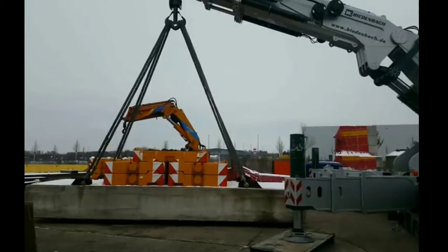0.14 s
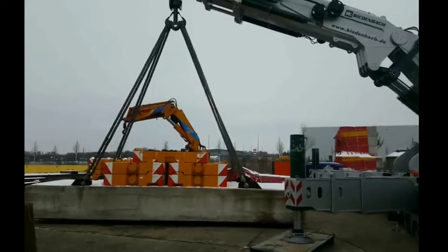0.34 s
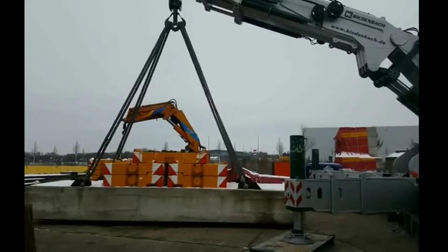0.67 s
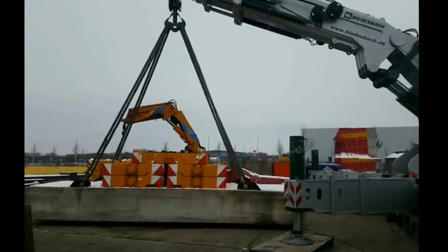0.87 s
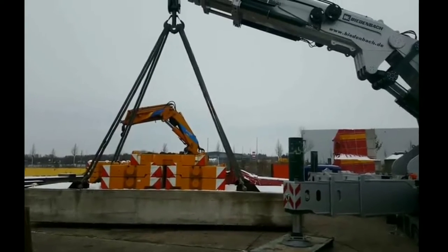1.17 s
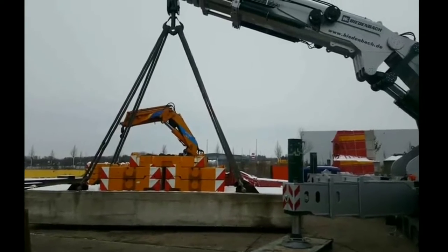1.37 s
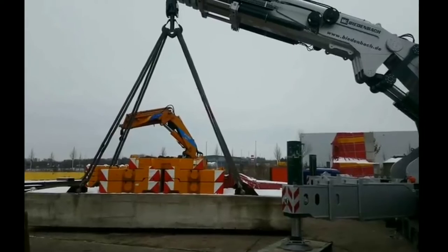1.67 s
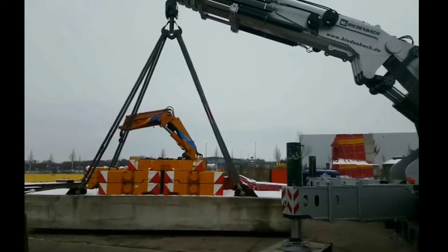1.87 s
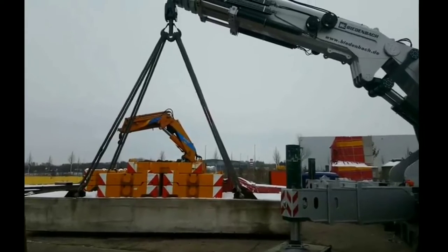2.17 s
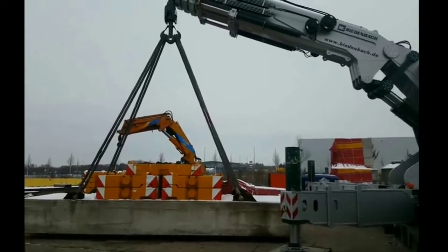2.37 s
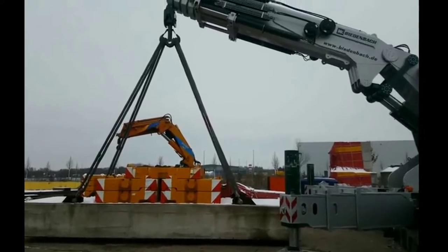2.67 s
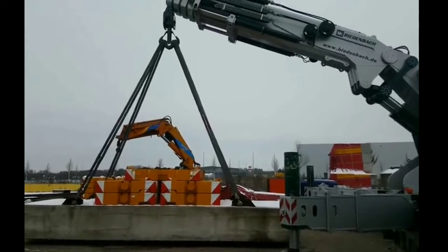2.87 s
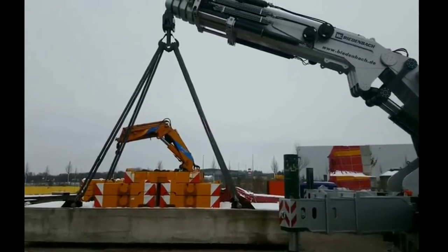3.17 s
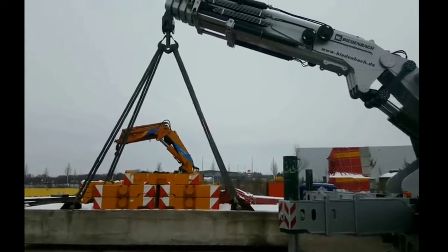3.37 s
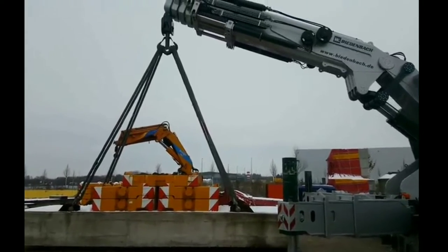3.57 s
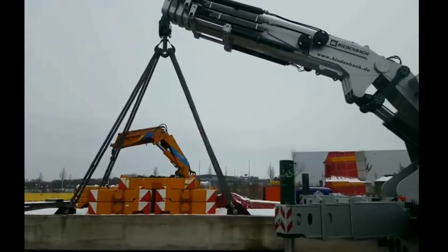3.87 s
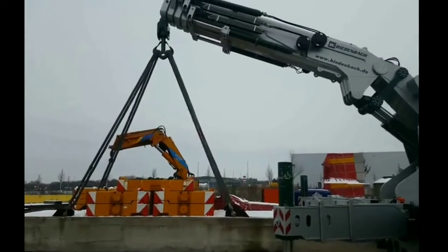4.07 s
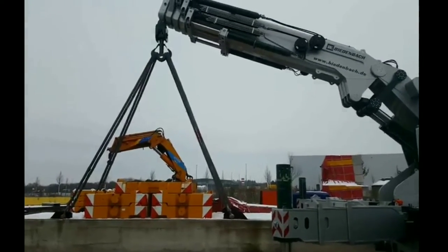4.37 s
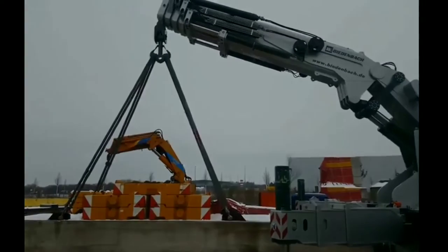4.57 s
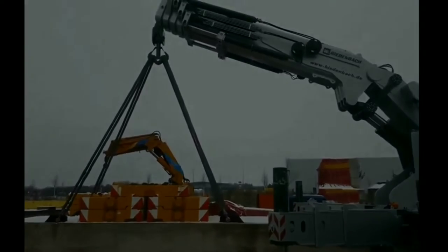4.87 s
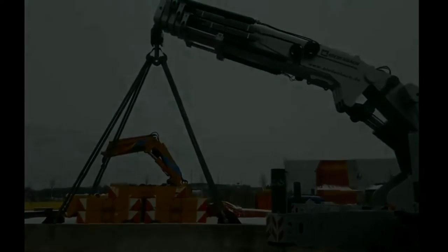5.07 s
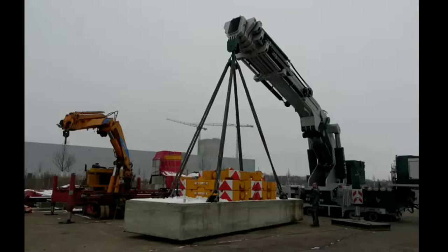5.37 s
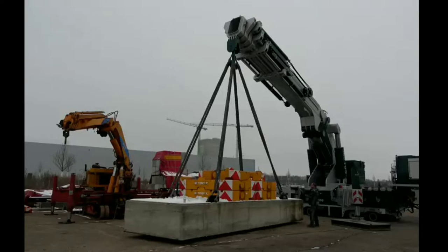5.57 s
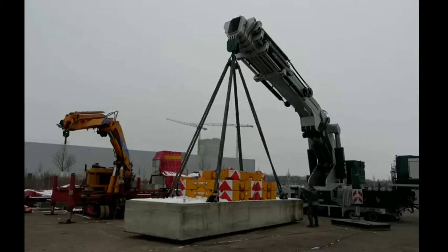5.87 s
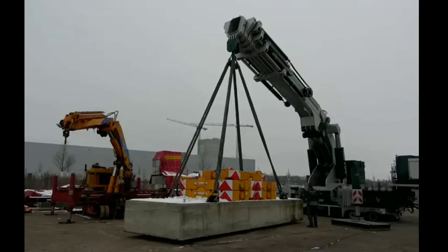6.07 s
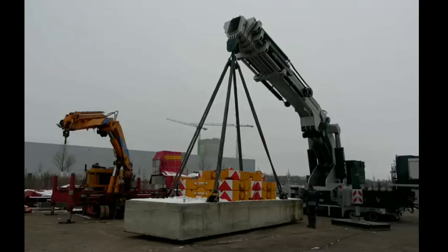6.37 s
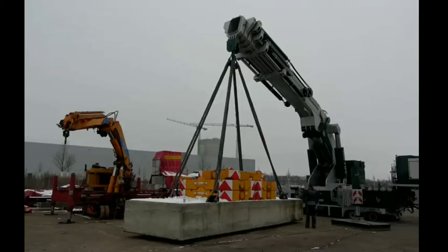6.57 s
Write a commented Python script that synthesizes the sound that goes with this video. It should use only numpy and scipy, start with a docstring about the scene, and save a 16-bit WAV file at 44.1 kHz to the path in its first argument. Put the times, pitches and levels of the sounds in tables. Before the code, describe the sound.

Heard close and in stereo outdoors, a crane's diesel engine holds a constant speed while its hydraulic pump and gears whine in several steady pitches over a rushing roar. The level steps down and fades out. With a brief click, the same machine cuts in from a distant mono position, its roar softer, and oil whistles through a valve on one high note until the end.

```python
"""An open yard, where a truck crane lifts a load. A six-cylinder diesel at governed speed drives a
seven-piston pump through gears; each radiates tones at multiples of the shaft rate, while a fan and a
second drive sing along over roar and clatter. The machine is heard close by at two spaced points, then
fades out; the sound cuts to a distant mono position, where oil also whistles through a valve."""
import sys
import numpy as np
from scipy import signal
from scipy.fft import rfft, irfft, next_fast_len
from scipy.io import wavfile
from scipy.ndimage import uniform_filter1d

SR = 44100
rng = np.random.default_rng(int(sys.argv[2]) if len(sys.argv) > 2 else 0)


def log_audio(samples):
    """Write samples as a 16-bit WAV file to the path given in sys.argv[1]."""
    # one column per channel
    frames = np.atleast_2d(samples).T
    # limit to full scale, then quantise
    limited = np.clip(frames, -1, 1)
    pcm = np.round(limited * 32767).astype(np.int16)
    wavfile.write(sys.argv[1], SR, pcm)


N = 296793
T = np.arange(N) / SR

SHAFT_HZ, FAN_HZ, DRIVE_HZ = 25.995, 53.35, 354.93
FADE_S, FADE_END_S, CUT_S = 4.118, 5.621, 5.6382

# Line spectra of the rotating parts. Each row: multiple of the shaft rate (for fan and second drive,
# of their own rate), near level in dB, near left minus right in dB, far level in dB.
ENGINE_TONES = [(2, -52, -1, -60), (3, -29.5, -1, -42), (3.5, -56, -3, -57), (4.5, -44.5, -1, -67),
                (5, -54, 0, -52), (5.5, -56, 1, -55), (6, -33.5, -1, -44), (6.5, -41, -1, -56),
                (7.5, -41, -1, -51), (9, -46, -2, -57), (10, -40, -2, -49), (12, -44, 8, -63),
                (15, -50, -6, -65), (18, -51, -6, -68), (20, -47, 1, -59), (20.5, -45, -1, -62),
                (22, -45, -4, -63), (22.5, -47, 0, -60), (23.5, -49, -1, -70), (26, -52, -1, -68),
                (29, -48, 0, -61), (30, -53, -12, -58), (35.5, -50, 0, -66), (36, -50, 2, -66),
                (45, -52, -6, -66), (50, -49, 0, -64), (37, -56, 6, -55), (48, -58, -8, -58)]
PUMP_TONES = [(7, -39, -1, -63), (14, -25, -8, -27), (21, -44, -6, -51), (27.5, -50, 0, -64),
              (28, -36.5, -2, -55), (28.5, -52, 0, -61), (35, -48, -1, -61), (42, -50, -2, -59),
              (49, -49, -1, -61), (56, -45, 0, -60), (70, -48, 2, -62), (84, -50, -6, -66)]
GEAR_TONES = [(38, -56, 5, -63), (39, -32, 0, -49), (40, -51, 0, -63), (41, -50, -2, -58),
              (44, -34.5, -2, -45), (62, -52, -3, -66), (75, -49, -10, -61), (77, -52, -12, -70),
              (78, -37, 3, -49), (78.5, -46, -6, -68), (87, -50, -8, -61), (88, -43, -5, -56),
              (90, -51, -10, -66), (116, -45, -10, -68), (117, -32.5, -6, -49), (118, -46.5, -3, -67),
              (119, -46, -6, -68), (132, -51, -6, -63), (156, -45, -15, -60), (195, -60, 0, -64),
              (234, -68, -4, -70)]
FAN_TONES = [(1, -41, -1, -50), (2, -47, -3, -55), (3, -41.5, -1, -57), (4, -44, 2, -59),
             (4.5, -49, 0, -64), (5, -47.5, 0, -67), (6, -55, -6, -55), (8, -58, 0, -56),
             (8.5, -47, -9, -53), (9, -58, 0, -57)]
DRIVE_TONES = [(2, -44, -1, -58), (5, -52, -2, -64), (6, -48, -10, -55), (9, -47.5, -3, -66),
               (10, -54, -2, -67), (11, -59, -4, -64), (12, -59, -2, -60), (13, -60, 0, -72),
               (15, -55, 0, -72), (17, -59, 0, -74), (18, -63, 0, -70), (19, -60, 0, -76),
               (20, -58, 0, -78), (21, -60, 0, -78), (22, -60, 0, -76)]
# Tones tied to no shaft. Each row: frequency in Hz, then the same three columns in dB.
LONE_TONES = [(161, -56, -1, -44.5), (326.5, -46, 1, -71), (381, -49, -2, -66), (1334.6, -51, 8, -63),
              (1525.1, -39, 2, -66), (7534.5, -62, 0, -80), (8110.4, -61, 0, -76), (9123.2, -63, 0, -80),
              (9585, -66, 0, -80)]
# Swell of the near pump tones with the load. Each row: time in seconds, gain in dB.
PUMP_LOAD = [(0, 0), (.7, -1), (1.3, 0.5), (1.9, 0.5), (2.3, -1.5), (2.9, -1.5), (3.5, 1), (4.1, 0.5),
             (5.6, 0.5)]
# Phase delay at the left listening point. Each row: frequency in Hz, lag in radians.
LEFT_PHASE_LAG = [(0, 0), (250, .15), (360, .7), (780, .8), (1120, 2.5), (1480, 3.15), (1525, 3.7),
                  (1720, 3.6), (2030, 5.15), (2290, 6.9), (3010, 10.05), (3530, 10.4), (5340, 15),
                  (8100, 18), (16000, 28.5)]
# Continuous spectrum of the roar. Each row: frequency in Hz, near density in dB per Hz, near left
# minus right in dB, coherence of the channels from 0 to 1, far density in dB per Hz.
ROAR_SPECTRUM = [(22.2, -76, -6, .96, -86), (40, -68, -7, 0.9, -80), (65, -66, -10, 0.95, -73),
                 (150, -56, 1.5, 0.91, -70), (374, -60, -2, 0.88, -71), (586, -62, -1.5, 0.85, -73.5),
                 (830, -66.5, 2, 0.9, -75), (980, -62, -3, 0.6, -81), (1060, -58.5, 0.5, 0.88, -74),
                 (1510, -60.5, 0.5, 0.69, -74), (2360, -65, -6, 0.44, -77), (3500, -67, -2.5, 0.43, -82.5),
                 (4470, -72, -0.5, 0.57, -84.5), (5800, -78.5, -1, 0, -87.5), (8300, -78, -3, 0.17, -93),
                 (10550, -84, 1.5, 0.25, -106), (13200, -80, -0.5, 0.04, -107), (15400, -91.5, 0, .2, -111)]
# Rattle of the gear teeth. Each row: centre in Hz, width in Hz, height above the roar in dB.
TOOTH_RATTLE = [(1954, 130, 3), (2350, 71, 3), (3040, 66, 6.5), (4090, 130, 3.5)]
# Part of the roar that repeats every engine cycle. Each row: frequency in Hz, power share from 0 to 1.
CYCLIC_SHARE = [(60, .25), (500, .3), (1200, .36), (2500, .26), (4500, .08), (6500, 0)]
# Course of the valve whistle. Each row: time in seconds, pitch in Hz, levels in dB of partials
# 1, 2, 4, 5, 7 and 8.
WHISTLE_PARTIALS = [(5.65, 1790.3, -31.5, -50, -56, -60, -66, -88),
                    (5.766, 1790, -29, -46, -53, -58.5, -73, -84),
                    (5.85, 1790.3, -28.8, -45, -53.5, -59.5, -76, -90),
                    (5.914, 1790.5, -28.5, -46.5, -65, -60, -72, -84),
                    (5.958, 1791, -31, -48.5, -63, -70, -67.5, -74),
                    (5.979, 1795, -44, -50, -57, -66, -69, -74),
                    (6.008, 1793, -30.5, -53, -48, -61.5, -70, -79),
                    (6.076, 1792.3, -26.5, -50.5, -52, -63.5, -76, -79),
                    (6.216, 1791.7, -33.5, -50, -53, -64.5, -75, -82),
                    (6.278, 1791.3, -29, -56, -51.5, -63, -73, -83),
                    (6.315, 1791.2, -30.5, -59, -53.5, -60, -69, -86),
                    (6.386, 1791, -33.5, -66, -57, -68, -76, -84),
                    (6.5, 1790, -33, -64, -53, -70, -76, -84), (6.57, 1790, -33, -55, -52, -71, -82, -88),
                    (6.69, 1789.7, -32.5, -57, -54.5, -70, -75, -82),
                    (6.72, 1789.6, -35, -55, -56, -68, -73, -78)]
# Its other overtones. Each row: harmonic number, level in dB at the reference time, drift in dB per
# second, share from 0 to 1 of the fundamental's swells and dips.
DRIFTING_OVERTONES = [(3, -54, 7, .01), (6, -76, -3, .3)]


def undb(db):
    """Amplitude grows tenfold for every 20 dB."""
    return 10 ** (np.asarray(db) / 20)


def walk(rate):
    """Smoothing random steps, `rate` a second, gives a slow fluctuation with a spread near 1."""
    hold = int(SR / rate / 64) + 1
    steps = np.repeat(rng.standard_normal(N // 64 // hold + 2), hold)
    smooth = uniform_filter1d(uniform_filter1d(steps, hold), hold)
    return 1.3 * np.interp(np.arange(N) / 64, np.arange(len(smooth)), smooth)


def curve(x, table):
    """Linear interpolation joins the points of a two-column table."""
    return np.interp(x, *np.transpose(table))


def tones(table, turns, hz, waver, slip, lag_drift=0, pace=1):
    """Shifting air paths modulate each tone in level (waver) and phase (slip). Rows: left, right, far."""
    out = np.zeros((3, N))
    for multiple, near_db, pan_db, far_db in table:
        tone_hz = multiple * hz
        stir = np.sqrt(min(tone_hz / 1000, 2))  # short waves are stirred more and faster
        phase = 2 * np.pi * (multiple * turns + rng.random()) + slip * stir * walk(5 + 14 * stir)
        envelope = undb(waver * stir * walk(pace * (4 + 16 * stir)))
        envelope *= np.sqrt(2 / np.mean(envelope ** 2))
        # the left delay shrinks by lag_drift seconds each second
        lag = curve(tone_hz, LEFT_PHASE_LAG) - 2 * np.pi * tone_hz * lag_drift * (T - 2.3)
        left = undb(near_db) * np.sqrt(2 / (1 + undb(-2 * pan_db)))
        right = left * undb(-pan_db)
        out += envelope * [left * np.sin(phase - lag), right * np.sin(phase), undb(far_db) * np.sin(phase)]
    return out


def diesel(turns):
    """A cycle of two turns gives whole and half orders; three firings a turn make the third strongest."""
    return tones(ENGINE_TONES, turns, SHAFT_HZ, waver=1.8, slip=.3)


def pump(turns):
    """Seven pistons pulse the oil, chiefly at multiples of order 7; the near tones follow the load."""
    sound = tones(PUMP_TONES, turns, SHAFT_HZ, waver=0, slip=.12)
    sound[:2] *= undb(curve(T, PUMP_LOAD))
    return sound


def gears(turns):
    """Modulation by the crank's uneven speed and by the mesh load gives the gear tones sidebands."""
    ripple = .00033 * np.sin(2 * np.pi * turns)
    mesh_load = 1 + .13 * np.sin(np.pi * turns)  # repeats every engine cycle
    mesh = tones(GEAR_TONES, turns + ripple, SHAFT_HZ, waver=1.1, slip=.12, lag_drift=1.2e-5, pace=2.5)
    return mesh_load * mesh


def fan():
    """Steady rotation gives a line spectrum on the fan's own rate."""
    return tones(FAN_TONES, FAN_HZ * T, FAN_HZ, waver=2, slip=.26)


def second_drive(turns):
    """A constant speed ratio makes this harmonic series follow the shaft."""
    return tones(DRIVE_TONES, turns * DRIVE_HZ / SHAFT_HZ, DRIVE_HZ, waver=4.5, slip=.15)


def roar(turns):
    """Cyclostationary noise: part repeats each engine cycle; the treble pulses with the firings."""
    size = next_fast_len(N)
    hz = np.maximum(np.arange(size // 2 + 1) * SR / size, 1)
    points, *columns = np.transpose(ROAR_SPECTRUM)
    near_db, pan_db, coherence, far_db = (np.interp(np.log(hz), np.log(points), c) for c in columns)
    cycle_samples = int(2 * SR / SHAFT_HZ)
    cycle_index = (turns / 2 % 1 * cycle_samples).astype(int)
    share = curve(hz, CYCLIC_SHARE)

    def noise():
        """Independent fresh and cyclic noise add in power."""
        fresh = rfft(rng.standard_normal(N), size)
        cyclic = rfft(rng.standard_normal(cycle_samples)[cycle_index], size)
        return np.sqrt(1 - share) * fresh + np.sqrt(share) * cyclic

    common = noise()
    coherent = np.sqrt(coherence) * common
    left = coherent * np.exp(-1j * curve(hz, LEFT_PHASE_LAG)) + np.sqrt(1 - coherence) * noise()
    right = coherent + np.sqrt(1 - coherence) * noise()
    gains = undb([near_db + pan_db / 2, near_db - pan_db / 2, far_db]) * np.sqrt(SR / 2)
    spectra = gains * tooth_rattle(hz) * [left, right, common]
    firings = np.cos(2 * np.pi * 3 * turns) + np.cos(2 * np.pi * turns)  # three a turn, one stronger
    out, shared_flicker = 0, walk(9)
    for octave in range(5, 15):
        band = np.cos(np.pi / 2 * np.clip(np.log2(np.maximum(hz, 32)) - octave, -1, 1)) ** 2
        treble = octave / 14
        knock = 1 + .05 * treble ** 2 * firings
        flicker = undb(.8 * treble * (.92 * shared_flicker + walk(20)))
        out += irfft(spectra * band, size)[:, :N] * knock * flicker
    return out


def tooth_rattle(hz):
    """Rattling teeth raise Lorentzian peaks in the roar around the mesh tones; returns the gain."""
    peaks = sum((undb(2 * db) - 1) / (1 + (2 * (hz - centre) / width) ** 2)
                for centre, width, db in TOOTH_RATTLE)
    return np.sqrt(1 + peaks)


def cut_click(level_db=-19, decay_s=.0001):
    """A sudden step has a broad spectrum, heard as a click at the cut."""
    return -undb(level_db) * (T >= CUT_S) * np.exp(-np.abs(T - CUT_S) / decay_s)


def valve_whistle(reference_s=6.2):
    """Oil forced through a valve gap oscillates periodically, giving harmonics that waver in level."""
    times, *columns = np.transpose(WHISTLE_PARTIALS)
    hz, level_db, *upper_db = (np.interp(T, times, c) for c in columns)
    swell_db = level_db - np.mean(level_db[T >= CUT_S])
    cycles = np.cumsum(hz) / SR + .008 * walk(40) + .03 * walk(3.02)

    def partial(multiple, db):
        """A harmonic is locked in phase to the fundamental; db is its RMS level."""
        return np.sqrt(2) * undb(db) * np.sin(2 * np.pi * (multiple * cycles + rng.random()))

    out = partial(1, level_db + .6 * walk(30))
    for multiple, db in zip((2, 4, 5, 7, 8), upper_db):
        out += partial(multiple, db + .8 * walk(30))
    for multiple, db, drift, share in DRIFTING_OVERTONES:
        drift_db = drift * (np.maximum(T, CUT_S) - reference_s)
        out += partial(multiple, db + drift_db + share * swell_db + 1.2 * walk(5.5) + 1.4 * walk(30))
    return out


def scene():
    """The sources superpose; the near sound steps down and fades linearly, then the far one cuts in."""
    turns = SHAFT_HZ * T + .004 * walk(1.2)
    machine = diesel(turns) + pump(turns) + gears(turns) + fan() + second_drive(turns)
    machine += tones(LONE_TONES, T, 1, waver=2.5, slip=.2)
    machine += roar(turns)
    fade = np.interp(T, [FADE_S, FADE_S + .0021, FADE_END_S], [1, undb(-7), 0])
    near = machine[:2] * fade
    far = (machine[2] + valve_whistle()) * (T >= CUT_S)
    return near + far + cut_click()


def record(dry):
    """Soft saturation rounds the loudest peaks, and a steep low-pass filter limits the bandwidth."""
    lowpass = signal.ellip(14, .3, 75, 15380, fs=SR, output="sos")
    return signal.sosfilt(lowpass, np.tanh(1.3 * dry) / 1.28)


dry = scene()
out = record(dry)
log_audio(out)
```